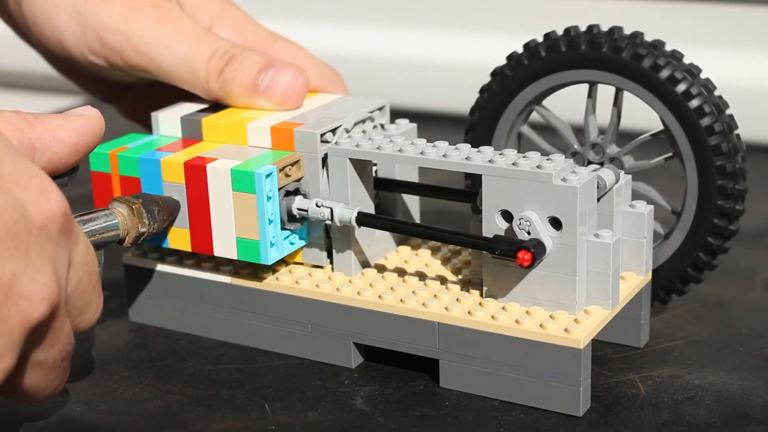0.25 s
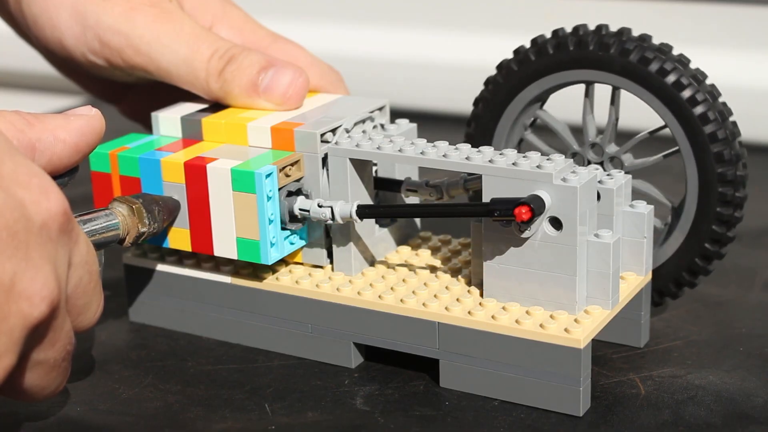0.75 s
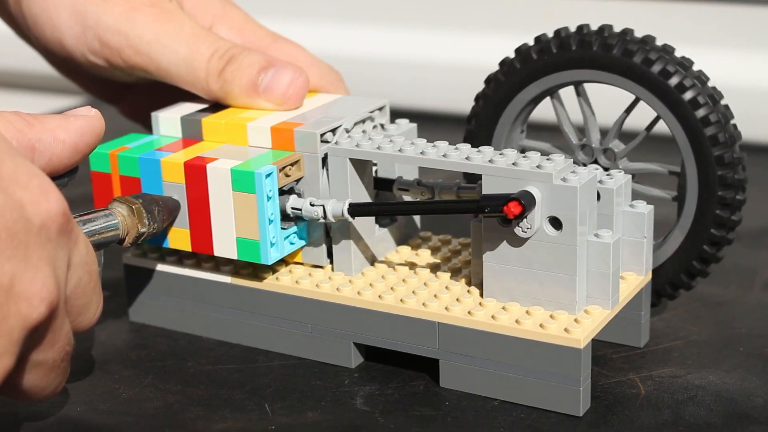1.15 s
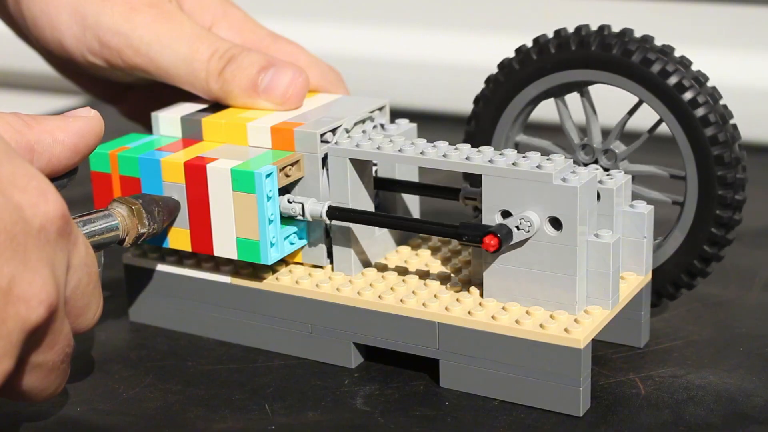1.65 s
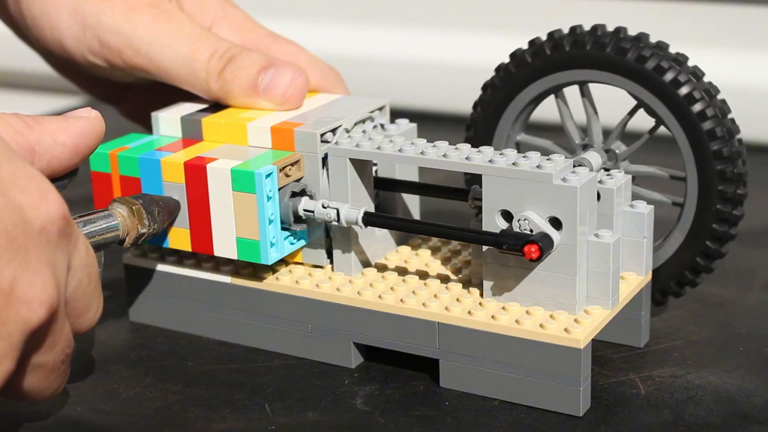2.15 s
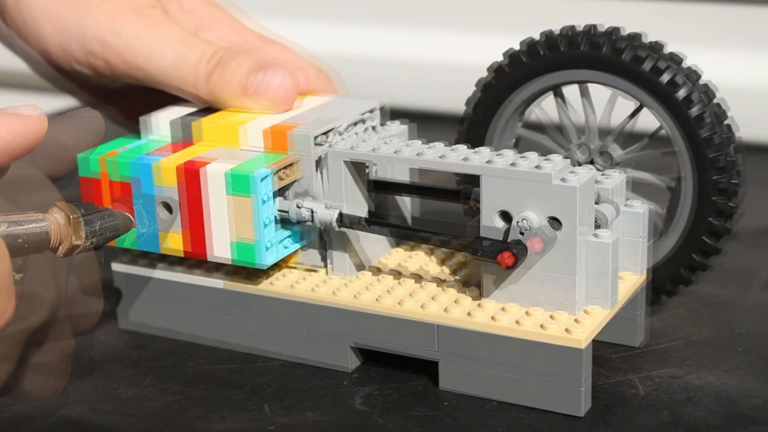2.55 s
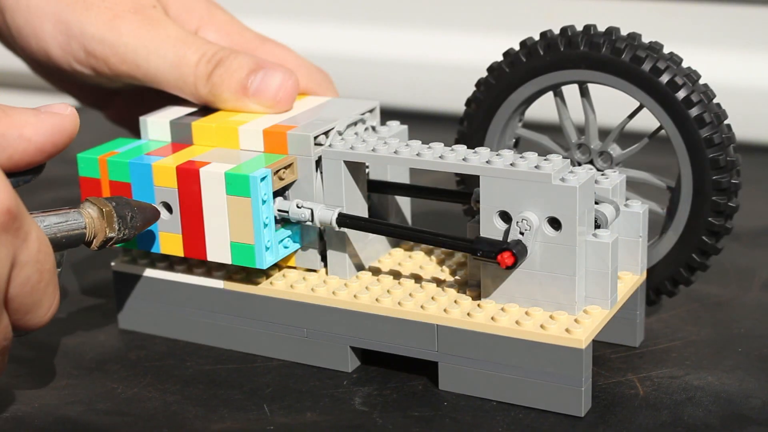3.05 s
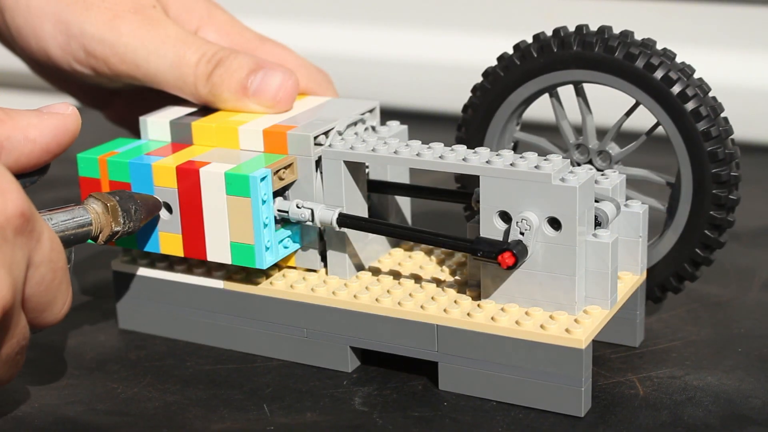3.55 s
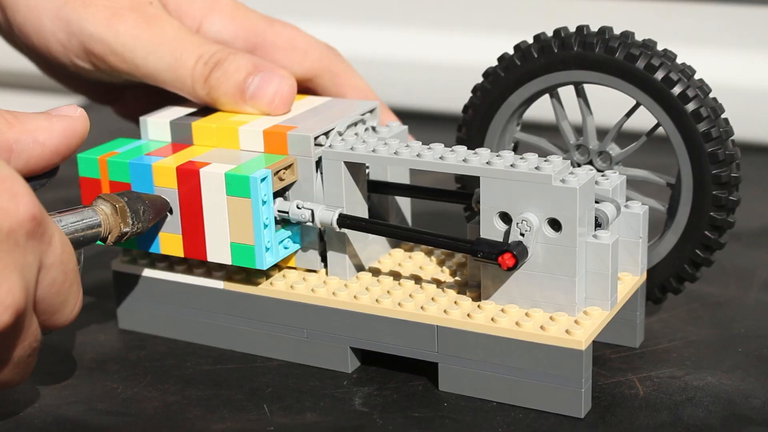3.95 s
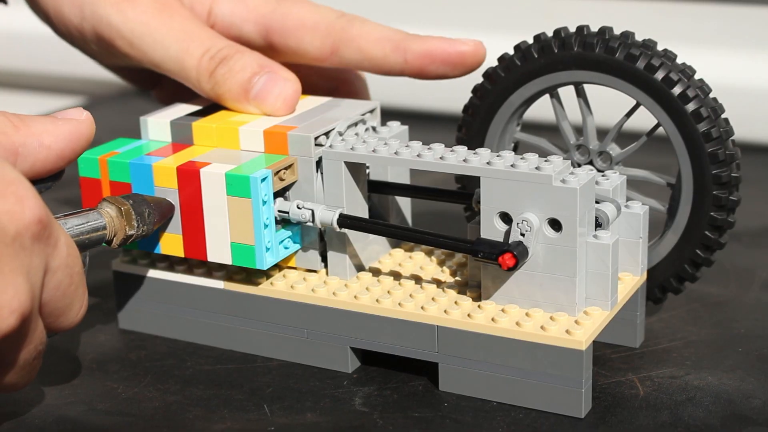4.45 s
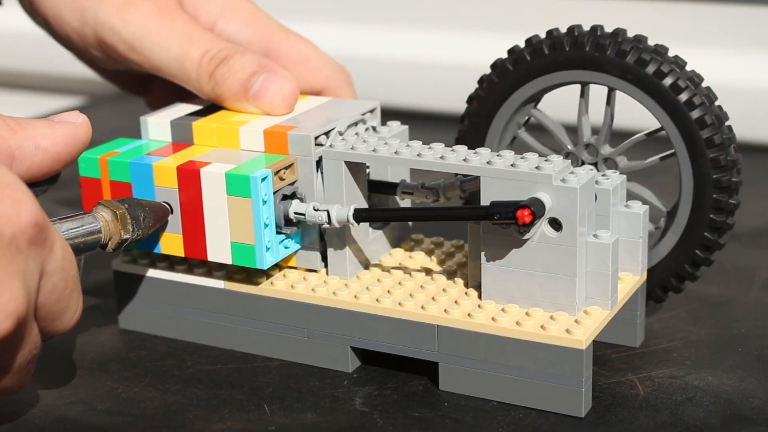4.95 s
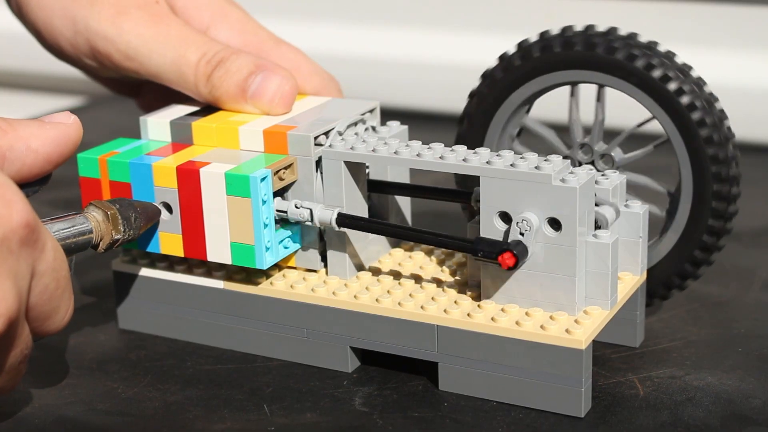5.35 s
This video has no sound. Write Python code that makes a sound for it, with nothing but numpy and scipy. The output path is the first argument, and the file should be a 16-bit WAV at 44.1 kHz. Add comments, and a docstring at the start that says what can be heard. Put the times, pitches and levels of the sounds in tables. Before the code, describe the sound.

Close up outdoors, a small air-driven piston engine puffs in bright rhythmic hisses with soft knocks, then abruptly gives way to a free air jet.

```python
"""Toy air engine, then a free jet

Close to the microphone, outdoors, a toy piston engine of plastic bricks runs on compressed air.
On every turn filtered noise squeezes past the valve and puffs from the exhaust, and short bursts knock softly.
Then a second scene starts abruptly while the engine fades out: a free jet of several noise colours hisses over
hollow bricks, its aim wavering, and low lumps of noise buffet the microphone.
Far off a motor drones: three wavering sines.
"""
import sys
import numpy as np
from scipy import signal
from scipy.fft import rfft, irfft
from scipy.io import wavfile

SR = 44100
rng = np.random.default_rng(int(sys.argv[2]) if len(sys.argv) > 2 else 0)


def transcribe(signal):
    """Save signal, clipped to [-1, 1], as a 16-bit WAV file at the path in sys.argv[1]."""
    frames = np.atleast_2d(signal).T
    limited = np.clip(frames, -1, 1)
    pcm = np.round(limited * 32767).astype(np.int16)
    wavfile.write(sys.argv[1], SR, pcm)


N = 247401
TIME = np.arange(N) / SR  # s
FREQS = np.maximum(np.fft.rfftfreq(N, 1 / SR), 1)  # Hz
JET_START_S = 2.25  # the second scene, with the jet, starts

# Turns of the crank, one piston knock each; columns: t/s, relative knock level/dB
TURNS = [(-.061, -45), (.309, -42.5), (.683, -46), (1.055, -44.5), (1.431, -45), (1.808, -45),
         (2.186, -44.5), (2.56, -58), (2.94, -59)]


def from_db(db):
    """Decibels to amplitude gain."""
    return 10 ** (np.asarray(db) / 20)


def rms_one(x):
    """Scale to unit power."""
    return x / np.sqrt(np.mean(x ** 2) + 1e-20)


def drift(rate_hz):
    """Slow random wander with an rms of 1: noise whose spectrum falls off above the rate."""
    spectrum = rfft(rng.standard_normal(N))
    return rms_one(irfft(spectrum / (1 + (FREQS / rate_hz) ** 2), N))


def lifts(modes):
    """Resonance peaks and notches in dB at every frequency."""
    return sum(lift / (1 + (2 * (FREQS - centre) / width) ** 2) for centre, width, lift in modes)


def airflow(slope, modes, flutter_db=0, flutter_hz=100):
    """Turbulence: noise in fluttering eddies, coloured by the resonances of the gap it passes; rms 1."""
    eddies = rng.standard_normal(N) * from_db(flutter_db * drift(flutter_hz))
    hz, level = np.transpose(slope)
    colour_db = np.interp(np.log(FREQS), np.log(hz), level) + lifts(modes)
    # beyond the ends of the slope the sound falls by 14 dB per octave below, 24 above
    colour_db = colour_db - 14 * np.maximum(np.log2(hz[0] / FREQS), 0)
    colour_db = colour_db - 24 * np.maximum(np.log2(FREQS / hz[-1]), 0)
    return rms_one(irfft(rfft(eddies) * from_db(colour_db), N))


def bursts(rows, rise_s, fall_s):
    """One quick swell that dies away exponentially for each (t/s, level/dB) row."""
    total = 0
    for start, db in rows:
        age = np.maximum(TIME - start, 0)
        decay = np.exp(-np.minimum(age / fall_s, 20))
        total = total + from_db(db) * (1 - np.exp(-age / rise_s)) * decay
    return total


def swells(rows, rise_s, fall_s):
    """Attack, hold and release per (t/s, length/s, level/dB) row; overlapping flows add in power."""
    power = 0
    for start, length, db in rows:
        age = np.maximum(TIME - start, 0)
        attack = 1 - np.exp(-age / rise_s)
        decay = np.exp(-np.clip((age - length) / fall_s, 0, 20))
        power = power + (from_db(db) * attack * decay) ** 2
    return np.sqrt(power)


def crank():
    """Angle of the crank in turns, counted from knock to knock; it rests after the last one."""
    return np.interp(TIME, np.array(TURNS)[:, 0], np.arange(len(TURNS)))


def each_turn(rows):
    """A smooth opening on every turn for each (share of the turn, half length/turns, level/dB) row."""
    turn = crank()
    total = 0
    for at, half, db in rows:
        offset = (turn - at + .5) % 1 - .5
        total = total + from_db(db) * np.exp(-(offset / half) ** 2)
    return total


def engine_fade():
    """The engine's air sounds steadily, then fades out quickly as its scene ends."""
    steady_db, end_s, fall_s = -1.17, 2.7, 0.022
    return from_db(steady_db) * np.exp(-np.clip((TIME - end_s) / fall_s, 0, 20))


def far_motor(waver_db, wander_rad):
    """The lowest orders of a distant motor waver on their way, and grow fainter halfway through."""
    # orders of the motor; columns: f/Hz, rms level before fading and waver/dB
    orders = [(34.2, -64.5), (68.2, -74.5), (101.2, -73)]
    fading_db = np.interp(TIME, [2.3, 2.8], [0, -9])
    drone = 0
    for hz, db in orders:
        level = from_db(db + fading_db + waver_db * drift(0.95))
        phase = 2 * np.pi * hz * TIME + wander_rad * drift(1.9)
        drone = drone + np.sqrt(2) * level * np.sin(phase)
    return drone


def buffeting(jet_on):
    """Stray air hits the microphone in lumps; the hardest ones reach up into the middle range."""
    # gusts of the jet sweeping over the microphone; columns: t/s, length/s, level/dB
    gust_rows = [(2.255, .055, -34.5), (2.35, .14, -51.5), (2.495, 0.192, -40), (2.68, 0.81, -45),
                 (3.13, 0.039, -43), (3.31, 0.058, -44), (3.44, 0.023, -40.5), (3.53, 0.032, -48),
                 (3.63, 0.078, -62), (3.79, 0.033, -54), (3.9, 0.26, -60), (3.97, 0.07, -44),
                 (4.52, .06, -48), (4.565, 0.075, -37.5), (4.65, 0.097, -34), (4.78, 0.097, -40),
                 (4.92, .13, -39.5), (5.09, 0.054, -41), (5.27, 0.14, -65.5)]
    # the hardest lumps of wind; columns: t/s, relative level/dB
    lump_rows = [(2.272, -22), (2.524, -24), (2.864, -28.5), (3.329, -38), (3.479, -33), (4.662, -18.5),
                 (4.704, -22)]
    # colour of the wind at the microphone; columns: f/Hz, relative density level/dB
    wind_slope = [(15, 1.5), (35, -5), (80, 1), (130, -6), (190, -7.5), (280, -16), (500, -18), (1000, -23),
                  (2500, -19)]
    draught = from_db(-79.5)  # a faint draught stays between the gusts
    gusts = draught + swells(gust_rows, rise_s=0.0091, fall_s=0.03)
    wind = gusts * airflow(wind_slope, [], flutter_db=3.0, flutter_hz=35.4)
    thud = airflow(wind_slope, [(700, 700, 6)], flutter_db=1.5, flutter_hz=100)
    lumps = from_db(-7.5) * bursts(lump_rows, rise_s=0.001, fall_s=0.0072) * thud
    return jet_on * (wind + lumps)


def surroundings(x, echo_db):
    """The bricks colour the close sound, and the bench returns it within a few milliseconds."""
    # reflections that lift or cancel narrow bands; columns: f/Hz, width/Hz, lift/dB
    brick_bands = [(3470, 110, -1.5), (5800, 220, -2.5), (5940, 100, 1.5), (6100, 92, 0), (7310, 130, 7),
                   (7360, 150, -7.5), (10080, 210, -3.5), (11060, 170, -6), (13000, 160, 6.5),
                   (15050, 200, -4), (15560, 220, -6)]
    delays_s = rng.uniform(0.00161, 0.0076, (4, 1))
    echoes = np.exp(-2j * np.pi * FREQS * delays_s).sum(axis=0)
    return irfft(rfft(x) * from_db(lifts(brick_bands)) * (1 + from_db(echo_db) * echoes), N)


def blast_spray_splash(jet_on):
    """The second scene opens with a short blast of the jet across a hole; a thin spray and splashes join in."""
    # blast, thin spray, splash on the flat brick face; columns: t/s, length/s, level/dB
    blast_rows, spray_rows, splash_rows = [(2.25, 0.14, -28.5)], [(2.58, 0.37, -33.5)], [(2.33, 0.32, -33),
                                                                            (3.15, 0.49, -41.5),
                                                                            (4.52, 0.49, -37)]
    # their colours; columns: f/Hz, relative density level/dB
    blast_slope, spray_slope, splash_slope = [(300, -20), (900, -17), (1800, -19), (3000, 3), (4200, -0.5),
                                              (5000, -2), (5600, -13), (7000, -3), (9000, -10),
                                              (13000, -14), (15000, -28)], [(8000, -7), (10500, -33), (11700, 8),
                                                             (12700, 2), (13500, -4), (14500, -11),
                                                             (16000, -22)], [(1200, -37), (3000, 0),
                                                                            (5000, 0), (6000, -1),
                                                                            (7200, 5.5), (8500, 8.5),
                                                                            (11000, -11.5), (15000, -10)]
    # resonances of the blast; columns: f/Hz, width/Hz, lift/dB
    blast_modes = [(1570, 140, 19.2), (2210, 230, 14.5), (2770, 120, 3.5), (3230, 160, 4.2),
                   (3740, 160, 11)]
    blast = airflow(blast_slope, blast_modes, flutter_db=0.6, flutter_hz=120)
    blast = blast * swells(blast_rows, rise_s=0.0013, fall_s=.095)
    spray = airflow(spray_slope, [], flutter_db=1.0, flutter_hz=120)
    spray = spray * swells(spray_rows, rise_s=0.041, fall_s=0.62)
    splash = airflow(splash_slope, [], flutter_db=1.3, flutter_hz=120)
    splash = splash * swells(splash_rows, rise_s=0.055, fall_s=0.067)
    return jet_on * (blast + spray + splash)


def free_jet(jet_on):
    """The jet rushes over the bricks, blows their hollows like a bottle and hisses at the rim of the inlet."""
    # air spilling over the bricks; columns: t/s, control level/dB
    spill = [(2.27, -29), (2.31, -24), (2.61, -26.5), (2.76, -37.5), (3.21, -37), (3.51, -34), (4.31, -34),
             (4.41, -37.5), (4.56, -31.4), (4.61, -36.5), (4.71, -31.5), (5.21, -34), (5.31, -38.5),
             (5.59, -36.5)]
    # the jet cutting across the rim as the hand wavers; columns: t/s, control level/dB
    aim = [(2.3, -28), (2.35, -28.6), (2.4, -27), (2.5, -24), (2.7, -20.5), (2.75, -27.5), (3.6, -29),
           (3.95, -27.5), (4.2, -24.6), (4.45, -26.5), (4.5, -31), (4.54, -26), (4.59, -30.0), (4.69, -27),
           (4.79, -29.5), (5.24, -24), (5.39, -27), (5.59, -26)]
    # colours of the four voices; columns: f/Hz, relative density level/dB
    rush_slope, hollow_slope, hiss_slope, edge_slope = [(60, -46), (300, -18.5), (470, -15.5), (620, -7),
                                                        (850, -7), (1400, -6), (2200, -4.5), (3000, -1.5),
                                                        (4500, 1), (5700, -13.5), (7500, -12), (12000, -9)], [(2000, -19), (2800, -10),
                                                                      (3200, -1.5), (4300, -4), (4900, -13),
                                                                      (5400, -28), (6500, -26)], [(4500, -38),
                                                                                      (5700, -13.5),
                                                                                      (6700, -13),
                                                                                      (7600, -8),
                                                                                      (8500, 0.5),
                                                                                      (9500, -2.5),
                                                                                      (11000, 3.5),
                                                                                      (12500, 0.5),
                                                                                      (14000, -18),
                                                                                      (15100, -11),
                                                                                      (16000, -26)], [(8000, -37),
                                                                                                    (9200, -2.5),
                                                                                                    (10200, -6),
                                                                                                    (11000, 4),
                                                                                                    (11800, -6),
                                                                                                    (12800, -16),
                                                                                                    (13600, -23),
                                                                                                    (15000, -27)]
    # their resonances; columns: f/Hz, width/Hz, lift/dB
    rush_modes, hollow_modes = [(1047, 160, 4.3), (1775, 480, 8.8), (2360, 180, 7.7), (6020, 160, 8.6)], [(3330, 240, 0.76), (3890, 230, 6), (4170, 150, 4.4)]
    hiss_modes, edge_modes = [(7800, 290, 4.3)], [(9400, 250, 2.4), (10100, 200, 4.3), (10500, 180, 2.3),
                                                  (11800, 250, 1.3)]

    # controls in dB about their usual values
    spill_db = np.interp(TIME, *np.transpose(spill)) + 35
    aim_db = np.interp(TIME, *np.transpose(aim)) + 29.5
    # each voice: level at the usual value, plus dB gained per dB of its control
    rush = from_db(-40 + 0.68 * spill_db) * airflow(rush_slope, rush_modes, flutter_db=1.07, flutter_hz=90)
    hollow = from_db(-37.5 + 1.03 * spill_db) * airflow(hollow_slope, hollow_modes, flutter_db=0.6, flutter_hz=90)
    hiss = from_db(-32 + 0.44 * aim_db) * airflow(hiss_slope, hiss_modes, flutter_db=0.7, flutter_hz=120)
    edge = from_db(-32.5 + 1.34 * aim_db) * airflow(edge_slope, edge_modes, flutter_db=1.0, flutter_hz=120)
    # the jet comes up to full level as the engine fades out
    fade_in = np.sqrt(np.clip(1 - 0.85 * engine_fade(), .05, 1))
    # the rush is strongest just as the second scene begins
    surge = 1 + swells([(JET_START_S, .07, 4)], rise_s=0.0029, fall_s=0.034)
    return jet_on * fade_in * (surge * rush + hollow + hiss + edge)


def piston_knocks():
    """At the end of the stroke the slack parts tick together, and the piston slides back dully."""
    # colours of the knock and of the sliding piston; columns: f/Hz, relative density level/dB
    knock_slope, slide_slope = [(350, -5.5), (1000, -6), (2300, -5), (3200, -6), (5000, -18), (8000, -40)], [(280, -11), (400, 0), (700, -0.5), (1050, 14), (1500, -3),
                                               (2500, -24)]
    # resonance of the brick frame under a knock; columns: f/Hz, width/Hz, lift/dB
    frame_modes = [(2420, 410, 10)]
    impact = bursts(TURNS, rise_s=.001, fall_s=.009)
    travel = bursts(TURNS, rise_s=.02, fall_s=.06)
    tick = from_db(6.5) * impact * airflow(knock_slope, frame_modes)
    slide = from_db(-1.5) * travel * airflow(slide_slope, [])
    return tick + slide


def valve_squirts():
    """Through the last narrow slit of the closing valve the air is brightest and most uneven."""
    # squirts as the valve changes sides, twice a turn; columns: share of the turn, half length/turns,
    # level before fading/dB
    squirt_rows = [(.985, .042, -26.5), (0.342, 0.034, -26)]
    # colour of a squirt; columns: f/Hz, relative density level/dB
    squirt_slope = [(8400, -36), (9200, -20), (9850, 6), (10500, 1), (11300, -10), (11800, -5),
                    (12200, -14), (12900, -18), (13450, -10), (14300, -23), (15200, -33)]
    fade_db_per_s = 2.5  # the squirts weaken as the engine runs on
    fading = from_db(-fade_db_per_s * TIME)
    air = airflow(squirt_slope, [], flutter_db=5.5, flutter_hz=250)
    return engine_fade() * fading * each_turn(squirt_rows) * air


def engine_air():
    """The crank opens and shuts the valve gap and the exhaust; the inlet leaks all the while."""
    # the valve gap widens three times a turn; columns: share of the turn, half length/turns, level before fade/dB
    openings = [(1, 0.077, -31), (0.3, 0.073, -28), (.64, 0.091, -37)]
    # colours of valve, exhaust and leak; columns: f/Hz, relative density level/dB
    valve_slope, exhaust_slope, leak_slope = [(5500, -29), (7500, -25), (8600, -17), (9300, 0), (10200, 0),
                                              (11200, -6), (11900, -6.5), (13400, -12.5), (14000, -17),
                                              (15000, -32), (16000, -34)], [(1500, -31), (2800, -25), (3800, -11.5),
                                                             (5000, -18.5), (5700, -25.5), (7400, -23),
                                                             (8600, -6), (10000, -12), (11200, -1),
                                                             (12200, -9), (13100, -13), (14200, -40)], [(60, -8), (240, -16),
                                                                              (400, -11), (800, -6),
                                                                              (1500, -2), (2700, -4),
                                                                              (3900, 2), (5000, 3),
                                                                              (5800, -7.5), (7500, -9),
                                                                              (12000, -4)]
    # their resonances; columns: f/Hz, width/Hz, lift/dB
    valve_modes, exhaust_modes, leak_modes = [(9980, 910, 5.8), (10600, 930, 2.1), (12200, 370, 2.5),
                                              (13500, 430, 4)], [(3140, 340, 4.7), (4930, 480, 11.5),
                                                                   (6400, 68, 2), (8580, 190, 1.7),
                                                                   (10610, 350, 11.2)], [(335, 10.5, 10.5),
                                                                                          (394, 22, -3),
                                                                                          (1600, 580, 2.2),
                                                                                          (3190, 440, 4.6),
                                                                                          (3820, 350, 5.6),
                                                                                          (4460, 190, 0),
                                                                                          (4700, 600, 1.5)]

    shut_gap = from_db(-31)  # the shut valve still lets this much through
    gap = shut_gap + each_turn(openings)
    # the exhaust is widest at 0.64 of each turn, and 19.5 dB weaker half a turn later
    exhaust_db = -25 - 19.5 * np.sin(np.pi * (crank() - 0.64)) ** 2
    # the loose valve never seats the same way twice
    seating = from_db(0.5 * drift(8.7))
    valve = gap * seating * airflow(valve_slope, valve_modes, flutter_db=0.5, flutter_hz=250)
    exhaust = from_db(exhaust_db) * airflow(exhaust_slope, exhaust_modes, flutter_db=2.1, flutter_hz=200)
    leak = from_db(-39.0) * airflow(leak_slope, leak_modes, flutter_db=0.56, flutter_hz=60.3)
    return engine_fade() * (valve + exhaust + leak)


def scene():
    """Engine, then jet, close by; wind at the microphone and the far motor; all in the middle."""
    jet_on = np.clip((TIME - JET_START_S) / 0.0018, 0, 1)
    engine = engine_air() + valve_squirts() + piston_knocks()
    bench = engine + free_jet(jet_on) + blast_spray_splash(jet_on)
    close = surroundings(bench, echo_db=-28)
    mono = close + buffeting(jet_on) + far_motor(waver_db=2.5, wander_rad=0.42)
    return np.stack([mono, mono])


def record(dry):
    """A steep elliptic low-pass cuts the top."""
    cutoff_hz = 15680
    low_pass = signal.ellip(12, .1, 85, cutoff_hz, fs=SR, output="sos")
    return signal.sosfilt(low_pass, dry)


dry = scene()
out = record(dry)
transcribe(out)
```